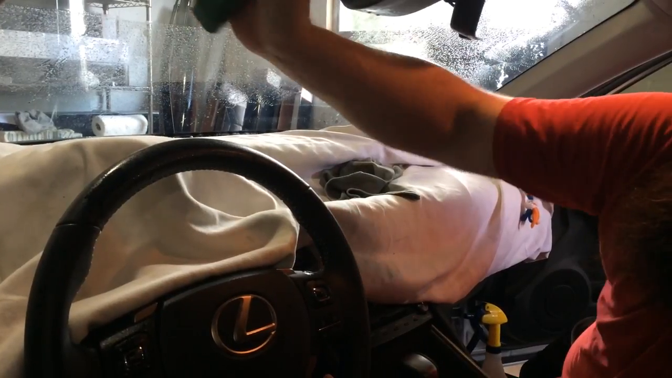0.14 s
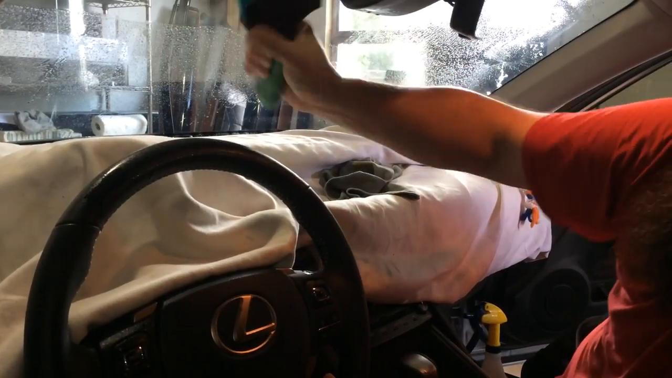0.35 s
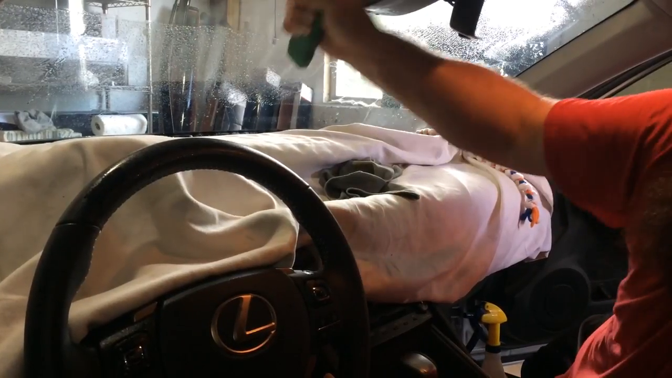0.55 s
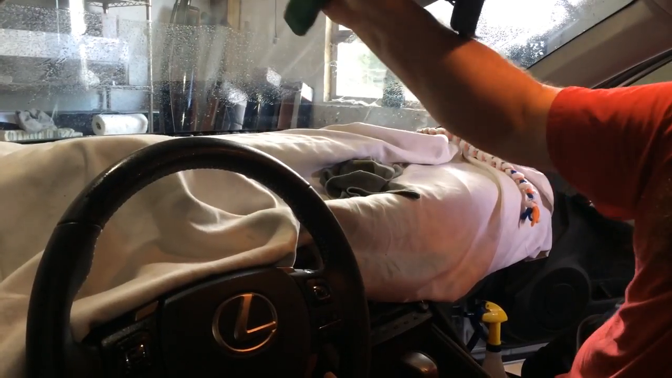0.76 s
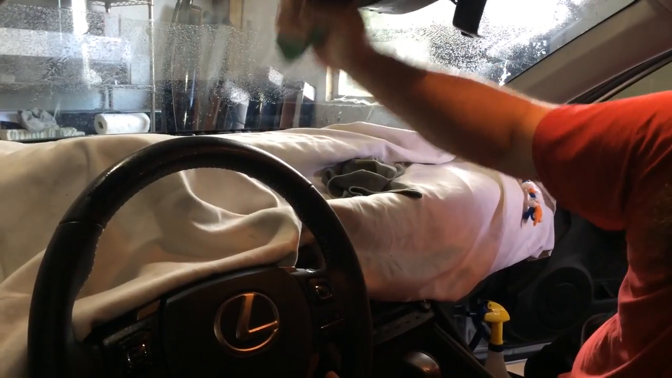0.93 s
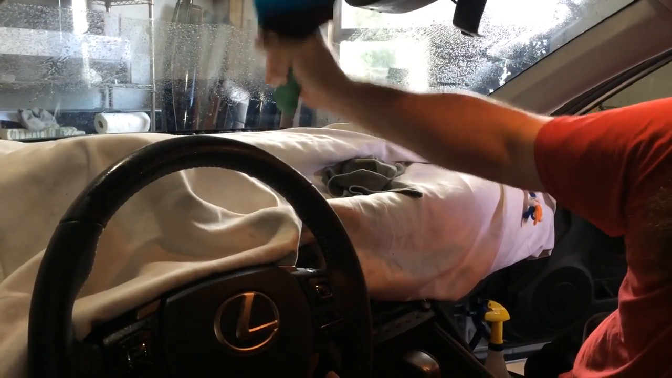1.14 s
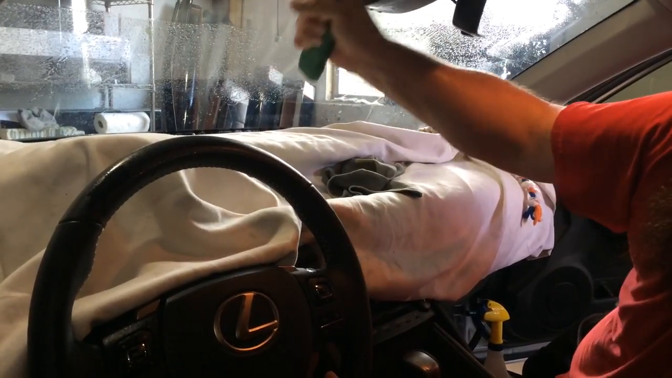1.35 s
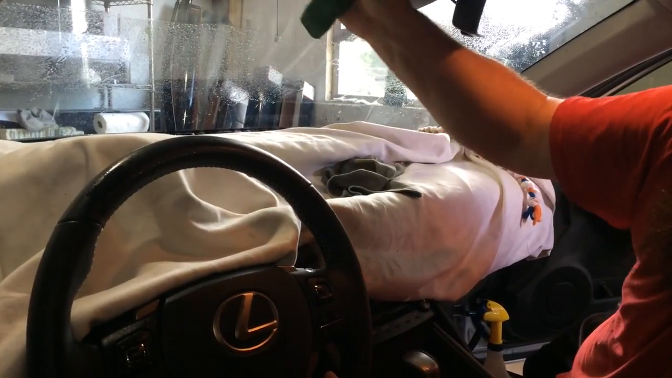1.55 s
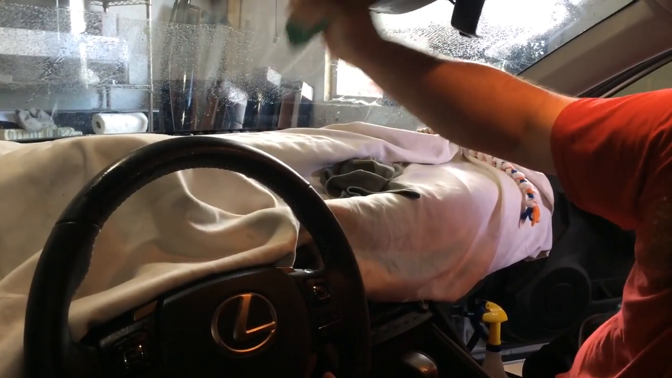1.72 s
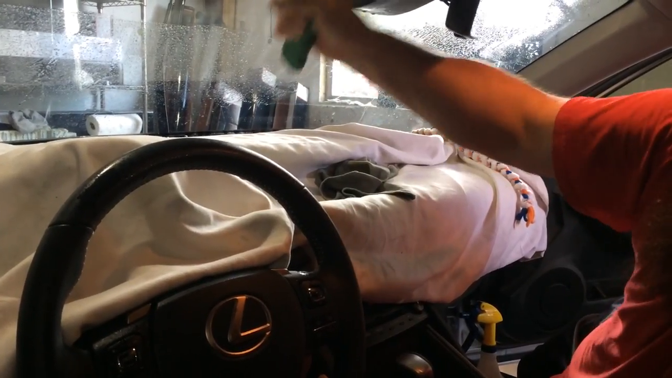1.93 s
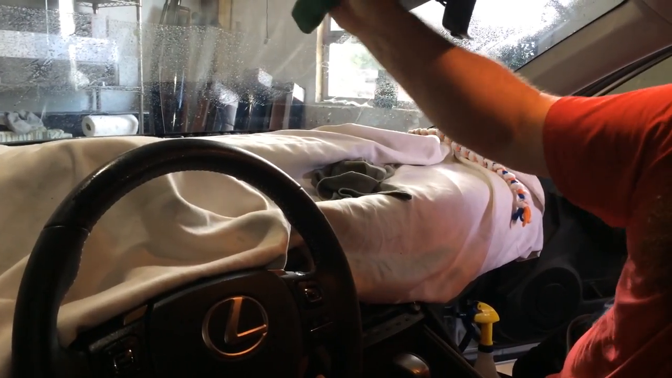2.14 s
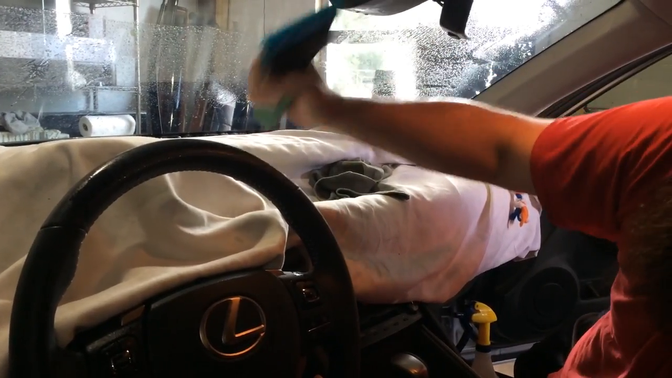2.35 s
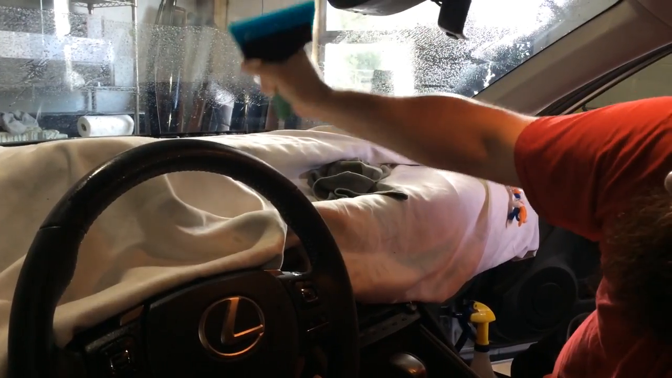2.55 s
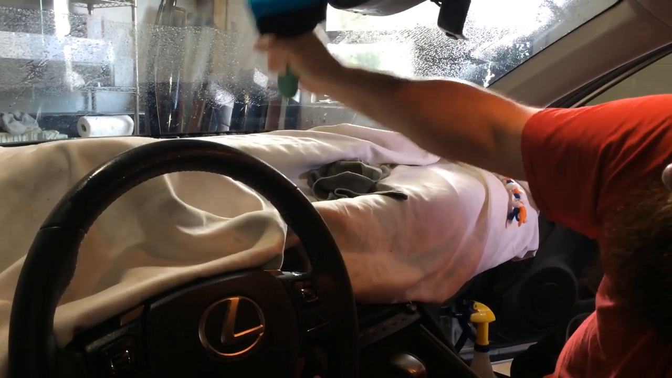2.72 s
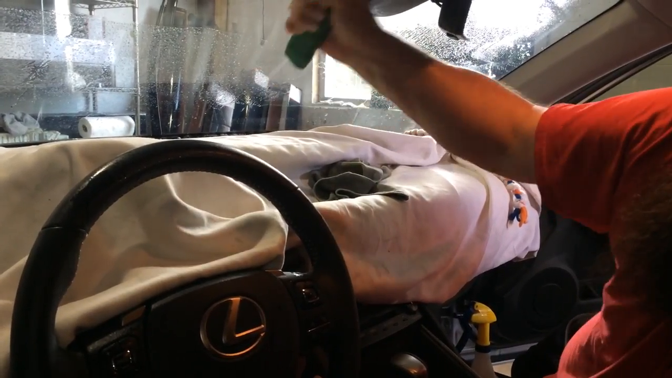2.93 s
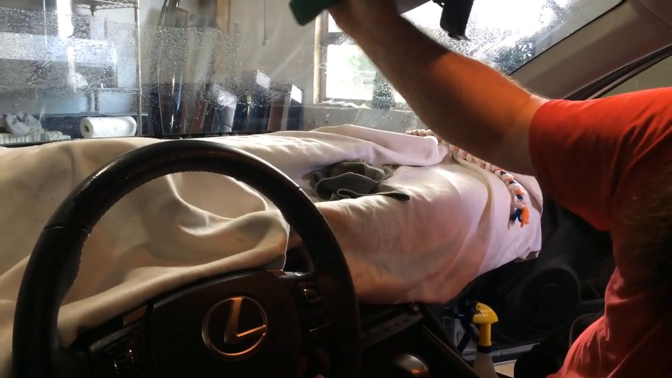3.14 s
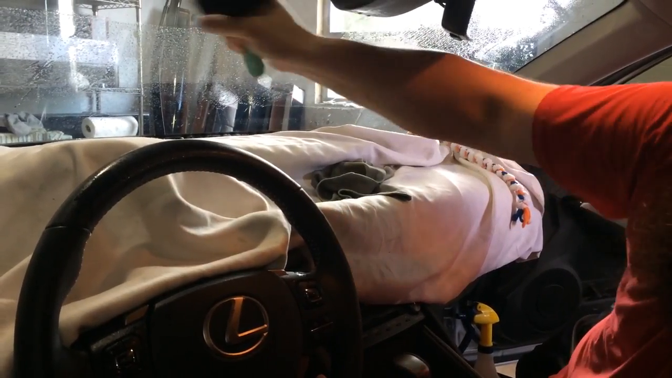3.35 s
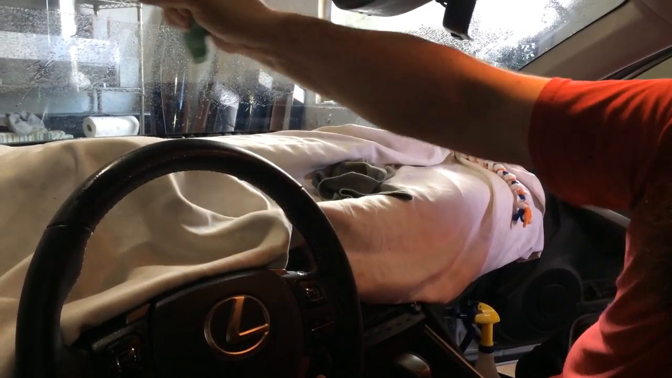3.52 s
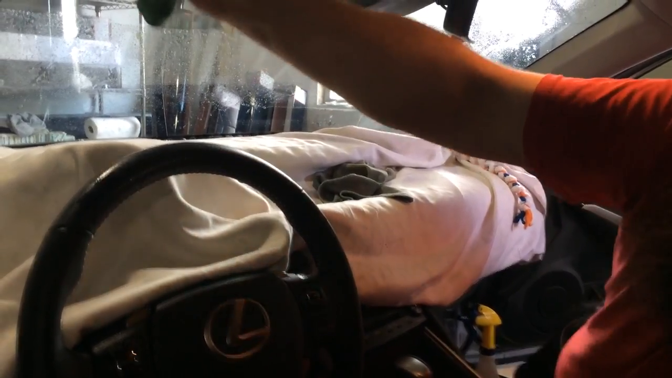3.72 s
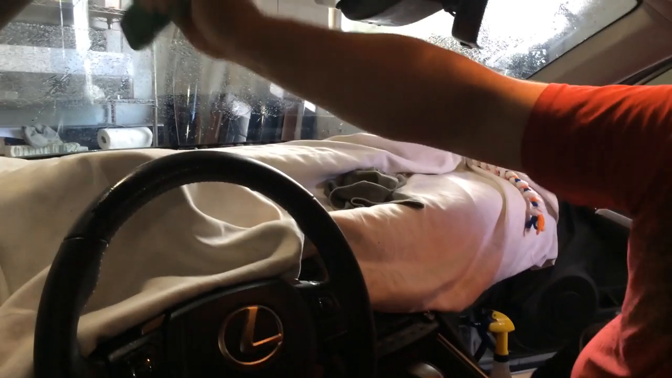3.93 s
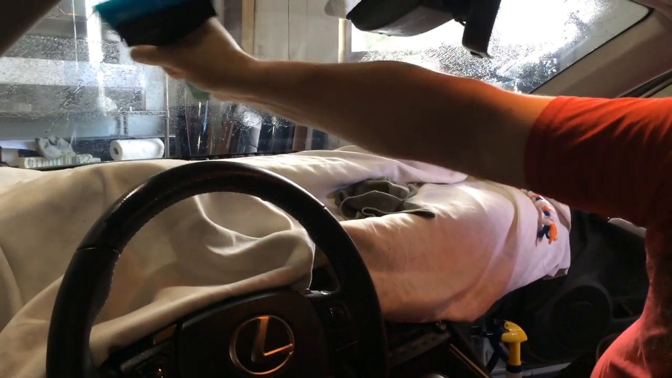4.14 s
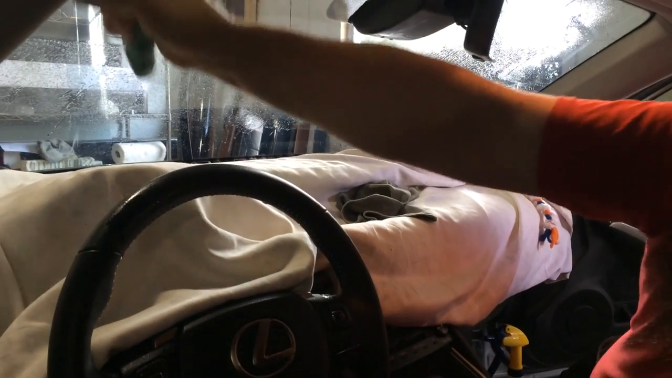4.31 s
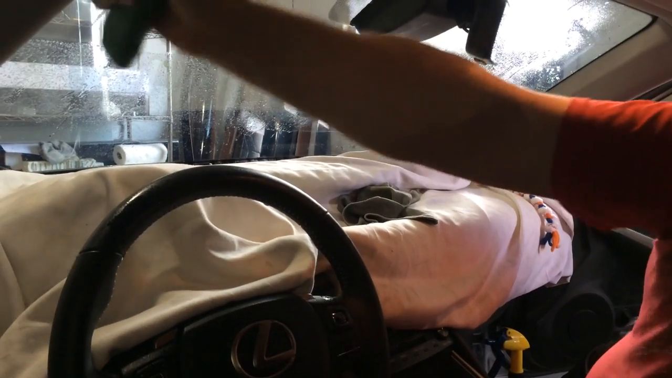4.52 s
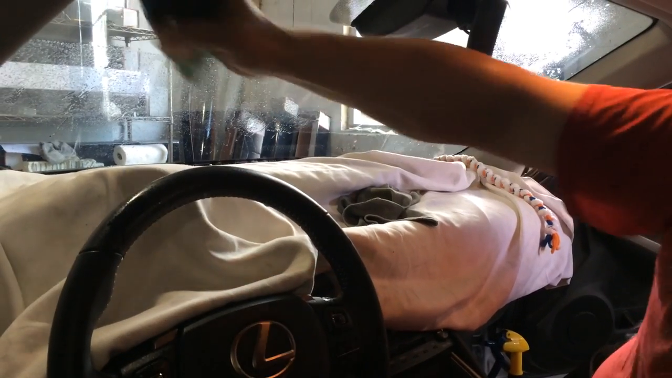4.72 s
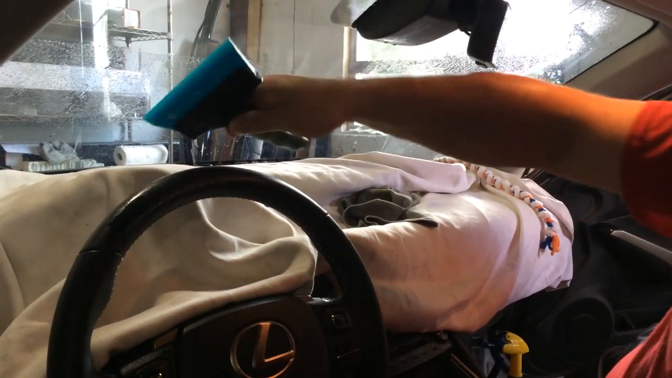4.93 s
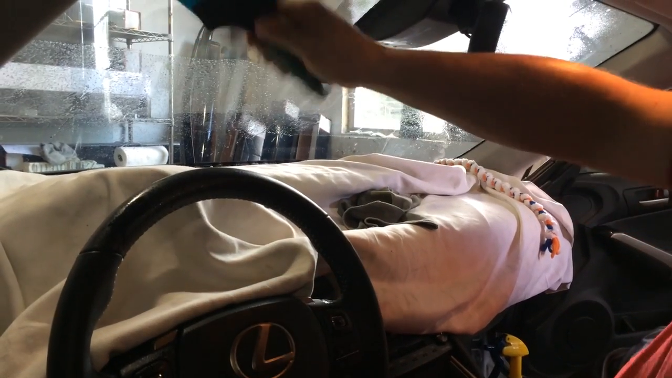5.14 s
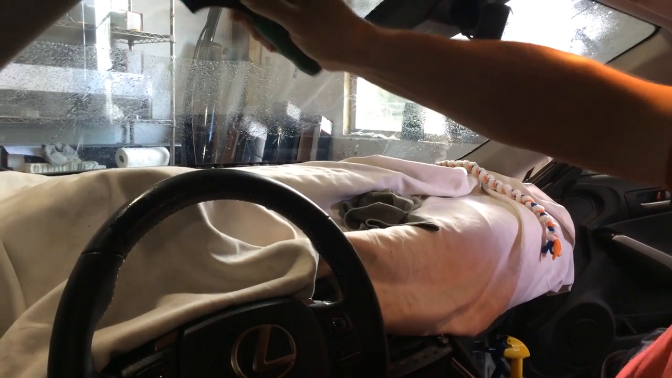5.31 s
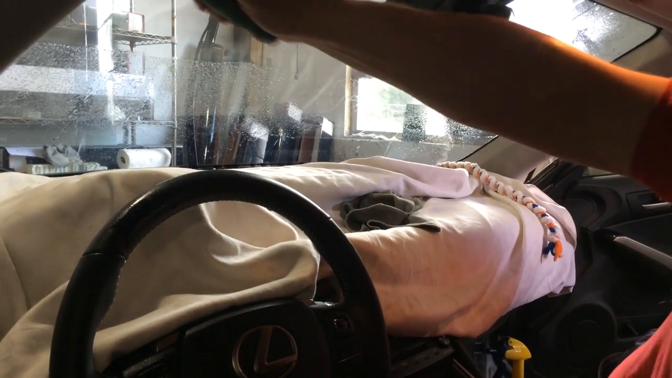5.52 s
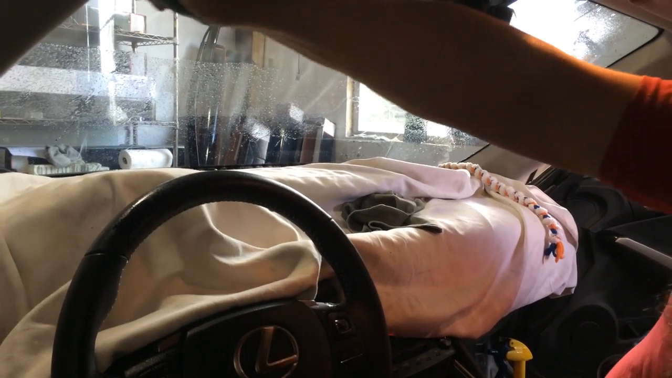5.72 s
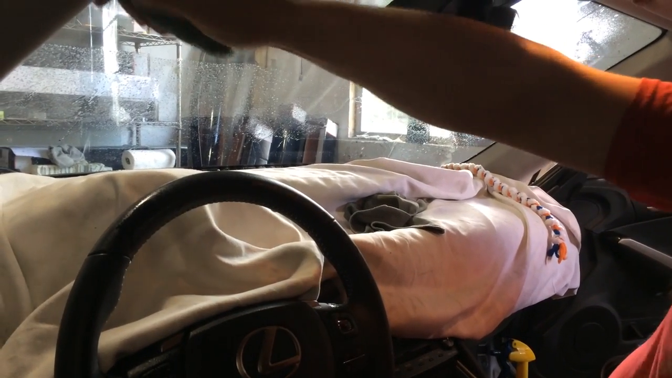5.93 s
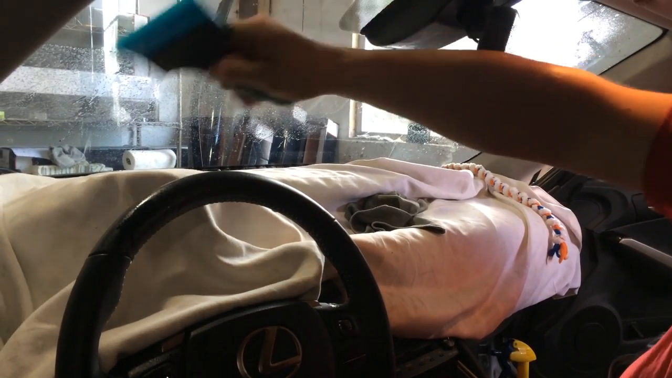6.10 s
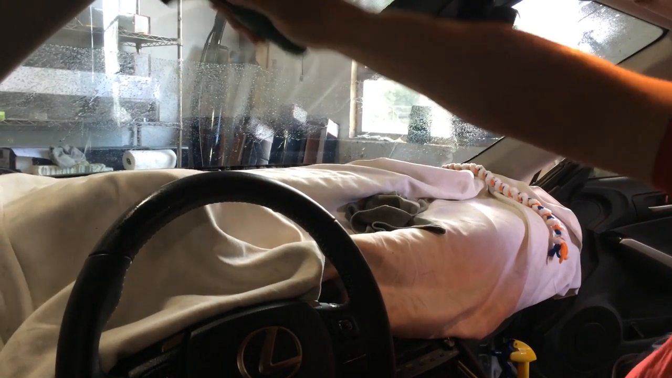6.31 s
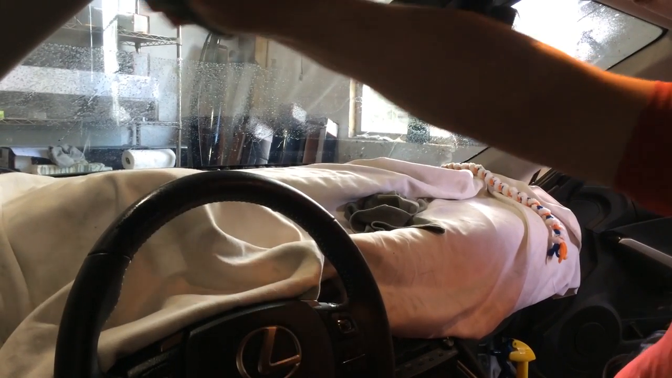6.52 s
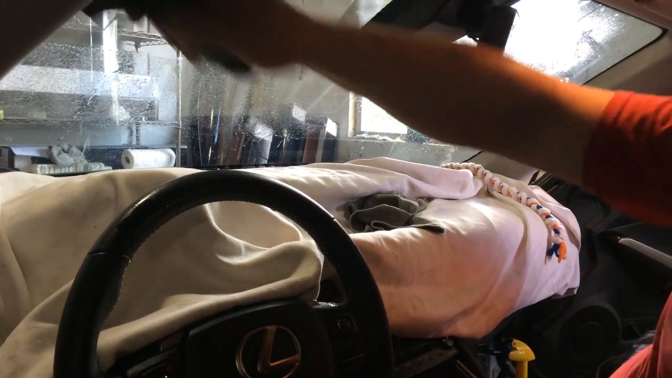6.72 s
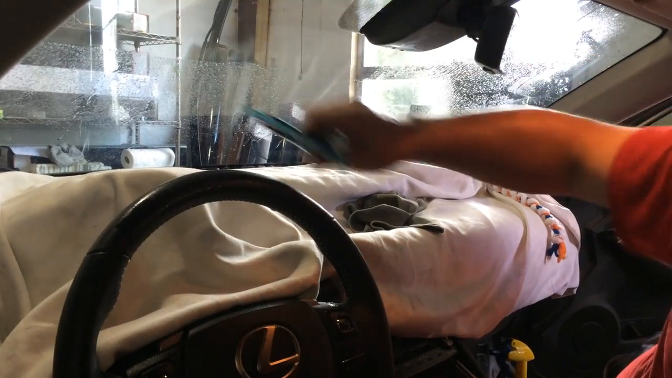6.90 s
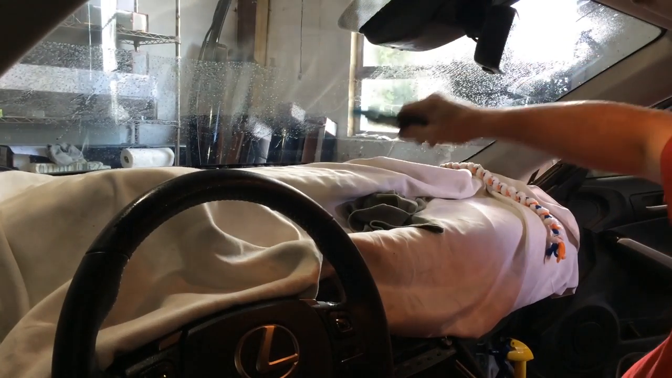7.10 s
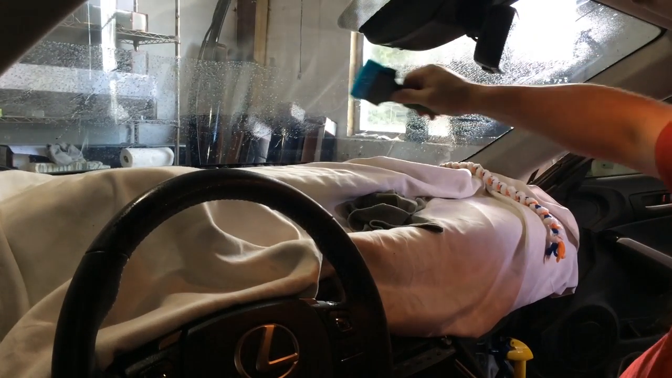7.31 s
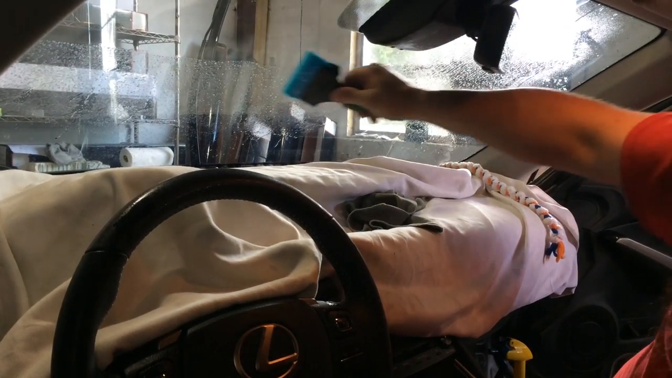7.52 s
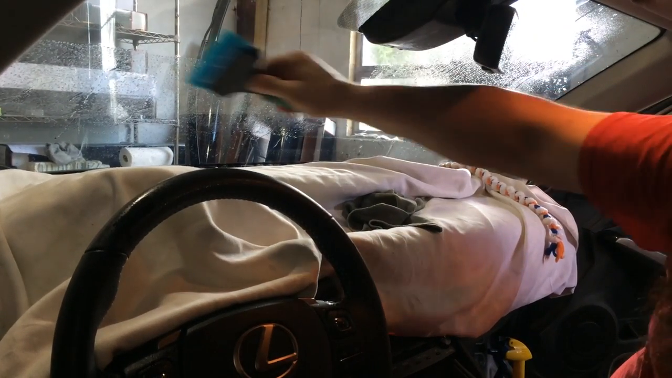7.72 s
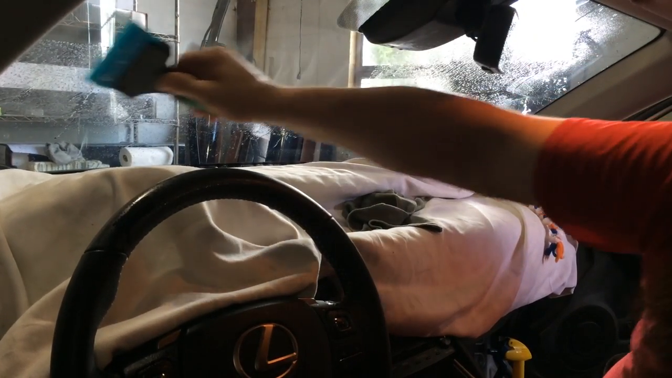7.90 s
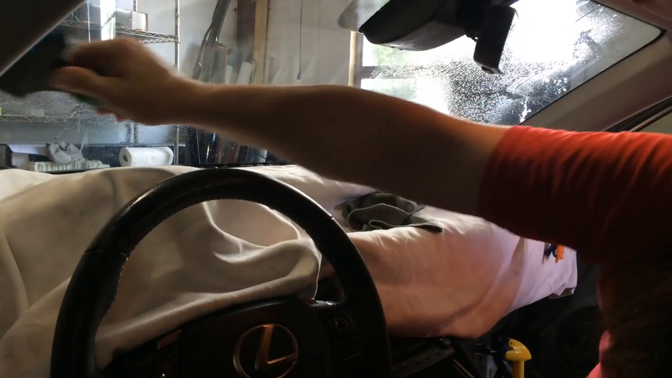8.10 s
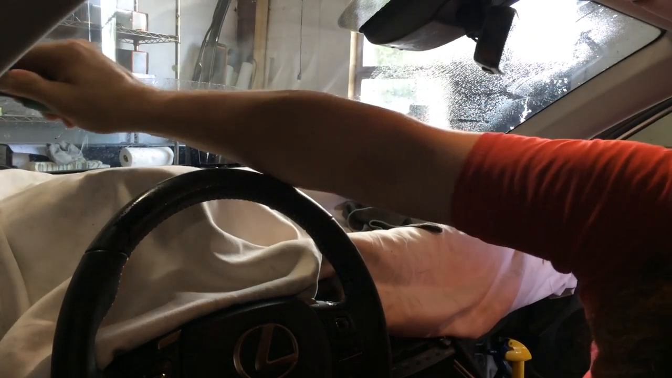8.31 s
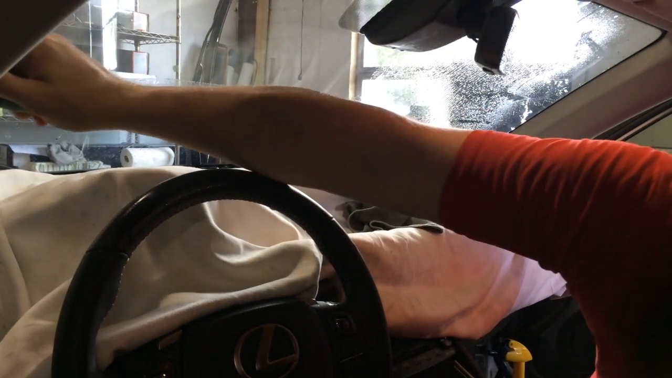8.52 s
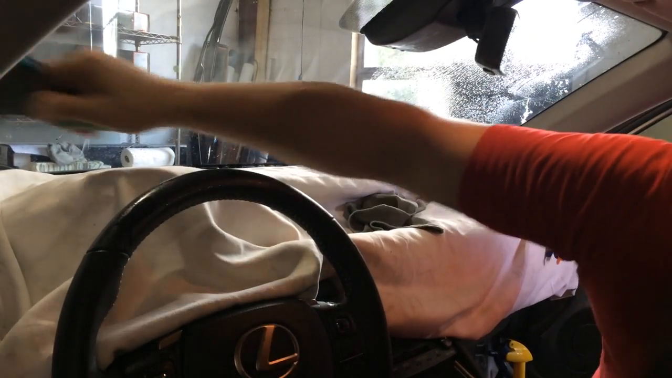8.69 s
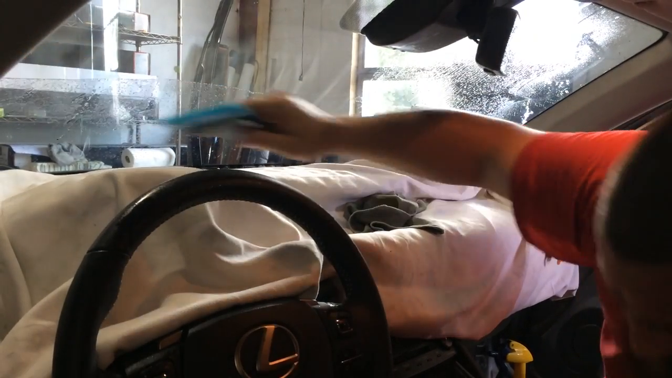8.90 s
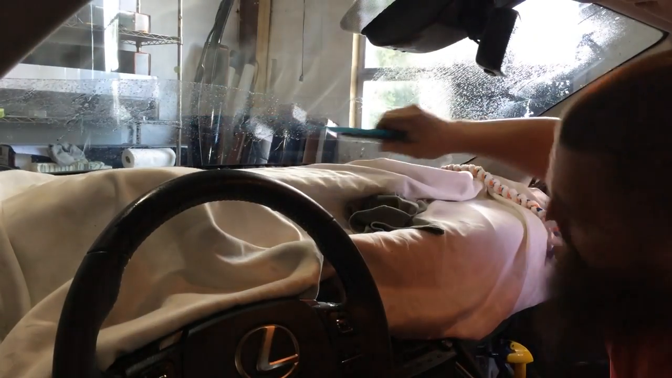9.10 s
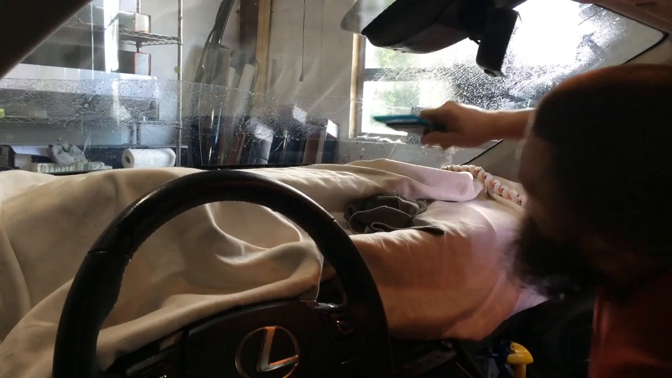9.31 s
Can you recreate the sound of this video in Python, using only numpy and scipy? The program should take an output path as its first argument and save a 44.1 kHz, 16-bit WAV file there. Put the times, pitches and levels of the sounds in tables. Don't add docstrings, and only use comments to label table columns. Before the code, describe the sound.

Inside a parked car, a squeegee slaps wet windshield glass nine times with sharp clacks, faint squeaks and wet swishes over a steady low hum.

```python
import sys
import numpy as np
from scipy import signal
from scipy.fft import rfft, irfft, next_fast_len
from scipy.io import wavfile
from scipy.ndimage import uniform_filter1d, map_coordinates

SR = 44100
rng = np.random.default_rng(int(sys.argv[2]) if len(sys.argv) > 2 else 0)


def wav_out(sig):
    wavfile.write(sys.argv[1], SR, np.round(np.clip(np.atleast_2d(sig).T, -1, 1) * 32767).astype(np.int16))


def makeup_ratio(level_db):
    decades = np.asarray(level_db, float) / 20
    return 10 ** decades


N = 412335
TIME = np.arange(N) / SR


def unit(x):
    return x / np.sqrt(np.mean(x ** 2) + 1e-20)


def along(points, hz):
    f, v = np.transpose(points)
    return np.interp(np.log(hz + 1), np.log(f + 1), v)


def filtered(x, response):
    m = next_fast_len(len(x) + SR // 4)
    return irfft(rfft(x, m) * response(np.fft.rfftfreq(m, 1 / SR)), m)[:len(x)]


def shaped(x, spectrum):
    return filtered(x, lambda hz: makeup_ratio(along(spectrum, hz)))


def resonant(peaks):
    def response(f):
        total = 0
        for k, (centre, width, db) in enumerate(peaks):
            damping = 1j * f * width
            total = total + (-1) ** k * makeup_ratio(db) * damping / (centre * centre - f * f + damping)
        return total
    return response


def noise(spectrum, patchy_db):
    z = signal.stft(rng.standard_normal(N + 512), nperseg=512)[2]
    field = uniform_filter1d(rng.standard_normal(z.shape), size=6, axis=0)
    field = uniform_filter1d(field, size=10, axis=1)
    white = signal.istft(z * makeup_ratio(patchy_db * unit(field)), nperseg=512)[1][:N]
    return unit(shaped(white, spectrum))


def add(track, s, sound):
    part = track[round(s * SR):][:len(sound)]
    part += sound[:len(part)]


def ring(modes):
    t = TIME[:SR // 2]
    gains = makeup_ratio(1.5 * rng.standard_normal(len(modes)))
    out = 0
    for gain, (hz, db, t60, side) in zip(gains, modes):
        out = out + gain * side * makeup_ratio(db - 60 * t / t60) * np.sin(2 * np.pi * hz * t)
    return out


def echo(x, decays):
    out, step = np.zeros(N), SR // 3
    for k in range(0, N, step):
        hz, t, z = signal.stft(rng.standard_normal(SR // 2), SR, nperseg=256)
        fade = makeup_ratio(-60 * t / along(decays, hz)[:, None])
        tail = signal.istft(z * fade, SR, nperseg=256)[1]
        add(out, k / SR, signal.fftconvolve(x[k:k + step], tail / np.linalg.norm(tail)))
    return out


# (frequency [Hz], width [Hz], level [dB])
HUM = [(145.76, 7.8, 0.5), (166.3, 12, -1.5)]
# (frequency [Hz], density [dB per Hz])
RUSH = [(25, -11.5), (60, -10), (100, -9.5), (160, -9), (290, -11.5), (420, -18), (800, -25), (1250, -26),
        (1700, -24.5), (2300, -29), (3200, -32.5), (4200, -37.5), (8000, -46), (15500, -54.5)]


def workshop():
    hum = filtered(rng.standard_normal(N), lambda hz: resonant(HUM)(hz) ** 2)
    sway = map_coordinates(rng.standard_normal(40), [TIME * 4])
    rush_db = -53.5 + 0.4 * sway
    return makeup_ratio(-51) * unit(hum) + makeup_ratio(rush_db) * noise(RUSH, patchy_db=1.68)


# (time [s], hiss level [dB])
HISS = [(0, -86), (1.5, -75.5), (4.6, -74), (5.7, -79), (8.0, -91), (8.75, -72), (8.9, -60.5),
        (9.35, -54.5)]
# (time [s], crack [dB], glass [dB], knock centre [Hz], edge sharpness [dB])
SLAPS = [
    (0.5001, -25.5, -23, 870, -0.5),
    (1.2489, -23, -18, 860, -2),
    (1.8981, -19, -19.5, 920, -1.5),
    (2.6567, -26.5, -28.5, 1010, 0),
    (3.4106, -9.5, -19.5, 1264, 5.5),
    (4.1975, -16.5, -27, 1124, -4.5),
    (5.2578, -24.5, -21, 806, -22),
    (6.2933, -19, -28.5, 880, 0.5),
    (7.3211, -26.5, -24.5, 746, -19),
]


def faint_hiss():
    power = makeup_ratio(np.interp(TIME, *np.transpose(HISS))) ** 2
    drain_db, drain_t60 = -46.5, 0.89
    for s, db, *_ in SLAPS:
        add(power, s, makeup_ratio(db + drain_db - 60 * TIME[:SR] / drain_t60) ** 2)
    return power


# (time [s], length [s], level [dB], brightness [dB])
SWISHES = [(.083, .066, -73, 0.1), (.247, .026, -59, -1.5), (0.6, 0.063, -74, -12), (.682, 0.023, -80, 9),
           (0.805, 0.036, -63, -6), (.954, 0.041, -60, -4.5), (1.532, 0.097, -68.5, 7.5),
           (1.546, 0.011, -56, 9.5), (1.715, 0.015, -64.5, -1.5), (2.127, 0.04, -64.5, 1.5),
           (2.259, 0.019, -54, -6), (2.562, .024, -80, -8), (2.908, .023, -70, 1.5), (3.123, .048, -68, -4),
           (3.234, 0.016, -55, -5.5), (3.806, .047, -68, -5), (3.912, .03, -70.5, 1),
           (3.952, 0.039, -72, -18), (4.492, 0.04, -68.5, -13), (4.604, .026, -64.5, -3),
           (4.892, .084, -77, 4), (5.092, .067, -70, 0), (5.91, 0.035, -78, -1.5), (5.976, .029, -78, 0.1),
           (6.111, 0.044, -84, -5), (7.653, 0.018, -81, 5), (8.164, 0.091, -73.5, -1),
           (8.956, 0.052, -61.5, 0), (9.17, .03, -78, 1.5)]
# (time [s], level [dB], brightness [dB])
SPITS = [(.338, -68, -2.5), (.454, -63, -10), (.469, -73, -15), (.769, -69, 9), (2.162, -63, -5),
         (3.027, -78, -12), (4.028, -75, -15), (4.105, -64.5, 1.5), (4.658, -77, -4), (4.978, -64.5, -1),
         (5.45, -69, -3), (5.811, -69, -7), (6.624, -75, -5), (6.72, -74, 4), (7.173, -71, -4),
         (7.721, -76, -7), (7.853, -65.5, -2.5), (8.349, -68.5, -6), (8.592, -73, 8)]
# (frequency [Hz], density [dB per Hz])
WET = [
    [(700, -47.5), (2000, -22.5), (4000, -23), (5000, -26.5), (8000, -43)],
    [(3200, -20), (5000, 1), (6300, 6), (8500, -0.5), (13000, -19)],
    [(5500, -29), (9000, -15), (11000, -14), (15000, -18), (17000, -17)],
]


def water():
    power = np.outer(makeup_ratio([-9., -10.5, -11.]) ** 2, faint_hiss())
    spits = [(s, 0.0066, db, bright_db) for s, db, bright_db in SPITS]
    for s, length, db, bright_db in SWISHES + spits:
        span = slice(max(round((s - 2 * length) * SR), 0), round((s + 2 * length) * SR))
        bell = np.exp(-abs((TIME[span] - s) / (0.47 * length)) ** 2.05)
        low_db = db + 0.5 - 0.57 * bright_db
        power[:, span] += np.outer(makeup_ratio([low_db, db, db + bright_db]) ** 2, bell)
    drops = makeup_ratio(1.55 * unit(uniform_filter1d(rng.standard_normal(N), size=40)))
    return sum(np.sqrt(p) * unit(drops * noise(band, patchy_db=4.0)) for p, band in zip(power, WET))


# (time [s], length [s], frequency
# [Hz], width [Hz], level [dB])
WHISTLES = [(.03, .05, 1700, 250, -67), (1.548, .008, 7500, 2500, -54), (2.262, .02, 5400, 700, -61),
            (2.9, .08, 1800, 200, -68), (3.232, .02, 5400, 700, -60), (3.95, .2, 3200, 600, -69),
            (3.97, .14, 1800, 350, -66), (4.44, .07, 7600, 800, -76), (4.47, .1, 1750, 200, -69),
            (8.63, .06, 6500, 250, -77), (8.695, .06, 3350, 200, -67), (8.96, .05, 6200, 1300, -61),
            (9.19, .04, 11000, 6000, -66), (9.315, .035, 4500, 5000, -60)]


def whistles():
    out = np.zeros(N)
    for s, length, hz, width_hz, db in WHISTLES:
        t = TIME[:round(2 * length * SR)]
        band = filtered(rng.standard_normal(SR // 2), lambda f: resonant([(hz, width_hz, 0)])(f) ** 2)
        swell = np.sin(np.pi * t / (2 * length)) ** 2
        add(out, max(s - length, 0), makeup_ratio(db) * unit(band)[:len(t)] * swell)
    return out


# (frequency [Hz], density [dB per Hz])
CRACK = [(700, -33), (2200, 25.5), (2600, 22.5), (4000, 14), (5000, 4.5), (6500, 14.5), (8000, -6),
         (11000, -73.5)]
# (frequency [Hz], density [dB per Hz])
TOP = [(5000, -12), (8000, -6), (10000, -5), (12500, -12), (15500, -22)]
# (share of the knock centre [1], width [Hz], level [dB])
BLADE = [(0.549, 400, 0.5), (0.999, 549, 10.5), (1.4, 600, 9.5), (1.9, 734, 5), (2.598, 850, -56.5)]


def contact(knock_db, knock_hz, top_db, click_db, t60):
    t = TIME[:SR // 8]
    spikes = rng.standard_normal(len(t)) * rng.random(len(t)) ** 2
    force = .25 * unit(spikes) * makeup_ratio(-60 * t / np.clip(t60, .005, .2))
    force[:12] -= makeup_ratio(click_db) * np.hanning(12) ** 3
    force = np.pad(force, (32, 0))
    crack, top = shaped(force, CRACK), shaped(force, TOP)
    blade = resonant([(share * knock_hz, w, db) for share, w, db in BLADE])
    soft_hz = 4650
    knock = filtered(force, lambda hz: blade(hz) / (1 + 1j * hz / soft_hz) ** 2)
    return sum(makeup_ratio(db) * part / abs(part).max() for db, part in ((0, crack), (knock_db, knock), (top_db, top)))


# (time [s], crack [dB], knock [dB], edge sharpness [dB])
TOUCHES = [(0.467, -52, 9, -20), (0.511, -48, -3, -7), (1.2456, -35, -2, -12), (1.256, -21.5, 3.5, -3),
           (1.9088, -23.5, 3.5, 0), (2.652, -48, 8, -9), (2.6672, -31.5, -1, 1), (2.6715, -46, -8, -1.5),
           (3.399, -54, -7, -3.5), (3.409, -43, -1, -16), (4.19, -40, 9, -18), (5.2604, -30, 4, -7.5),
           (6.2855, -47, 10, -14), (6.298, -30, 0, -22), (7.3229, -29.5, 7, -14), (7.358, -53, 1, 1.5),
           (8.589, -57, 11.5, -9)]
# (frequency [Hz], level [dB], t60 [s], side of the mode shape at the microphone [signed gain])
BOOM = [(60, 0, 0.23, -1)]
DRUM = [(82.6, -2.5, .14, 1.6), (97, -0.35, 0.26, -1), (120, -16, 0.65, -1.5)]
ROOF = [(144, 0, .38, 1)]
GLASS = [(168, 0, .22, 1), (207, -3, .1, -1)]
UPPER = [(252, 0, 0.15, 0.74), (300, -5, .05, -1.1), (378.4, -5, 0.099, 1), (496, -10.5, 0.014, -0.25),
         (600, 14, 0.07, -0.023)]
SHARES_DB = [-6, -10, -11.5, -12.5]
SHARES_DB_PER_S = [-.3, 0.31, 1.1, 1.1]


def slaps():
    blade, body = np.zeros(N), np.zeros(N)
    for s, db, glass_db, knock_hz, top_db in SLAPS:
        t60 = .028 * np.exp(-0.06 * (db + 17.5))
        add(blade, s + .0004, makeup_ratio(db) * contact(6.5, knock_hz, top_db, click_db=3, t60=t60))
        shares_db = np.array(SHARES_DB) + s * np.array(SHARES_DB_PER_S)
        groups = (BOOM, DRUM, ROOF, UPPER)
        others = sum(makeup_ratio(share_db) * ring(modes) for share_db, modes in zip(shares_db, groups))
        add(body, s + .001, makeup_ratio(glass_db) * (ring(GLASS) + others))
    for s, db, knock_db, top_db in TOUCHES:
        add(blade, s, makeup_ratio(db - 1) * contact(knock_db, 1356, top_db, click_db=-6.0, t60=0.017))
    return blade, body


# (time [s], push [dB], boom [dB], dullness [ms])
BUMPS = [
    (0.479, -42.5, 8, 2.4),
    (1.708, -32, -22, 6.6),
    (2.141, -36.5, 0, 2.6),
    (3.513, -39.5, 8.5, 4.4),
    (3.546, -38.5, 16, 13),
    (7.298, -34, -5, 3.4),
    (8.594, -41.5, -10, 1.9),
    (8.68, -47, 1, 4.5),
]


def bumps():
    out = np.zeros(N)
    for s, db, boom_db, ms in BUMPS:
        u = TIME[:SR // 20] * 3000 / ms
        push = u * np.exp(-u)
        damped = ring(GLASS + ROOF) * makeup_ratio(-200 * TIME[:SR // 2])
        sound = makeup_ratio(boom_db) * ring(BOOM + DRUM) + damped
        add(out, s, makeup_ratio(db) * np.convolve(sound, push / push.sum()))
    return out


# (frequency [Hz], density [dB per Hz])
FAR = [(200, -22), (1200, 10), (3000, -3.5), (7000, -10.5), (12000, -24.5), (16000, -37.5)]
# (frequency [Hz], t60 [s])
SHOP = [(300, 0.17), (2000, 0.32), (6000, 0.54), (14000, 0.067)]


def shop_answer():
    blows = np.zeros(N)
    s, db = np.transpose(SLAPS)[:2]
    blows[np.round(s * SR).astype(int) + 400] = makeup_ratio(db)
    return echo(shaped(blows, FAR), SHOP)


# (time [s], length [s], slip rate at start [Hz], at end [Hz], level [dB])
SQUEAKS = [(0.569, 0.054, 300, 260, -58), (0.602, 0.058, 338.6, 203, -53), (0.642, 0.062, 292, 206, -58.5),
           (.789, 0.054, 300, 150, -61), (2.017, .05, 287.6, 270, -56), (2.059, 0.054, 271.5, 240, -56),
           (2.771, 0.08, 290.7, 440, -58.5), (2.827, 0.052, 334.6, 260, -57.5),
           (2.855, 0.036, 300, 290, -53.5), (2.891, 0.078, 300, 330, -58.5), (3.022, 0.061, 214, 294, -54),
           (3.057, .05, 262.7, 300, -52.5), (3.766, .12, 356, 350, -70)]
# (time [s], length [s], level [dB])
LIFTS = [
    (.926, 0.043, -49),
    (1.7, 0.016, -54),
    (2.126, 0.017, -54),
    (2.247, 0.034, -48.5),
    (3.216, 0.032, -57.5),
    (4.494, 0.03, -53.5),
    (4.593, 0.017, -58),
]
# (frequency [Hz], width [Hz], level [dB])
RUBBER = [(266, 160, 2.5), (584, 326, 4.5), (910, 510, 2), (1200, 300, 0.5), (1950, 600, -13)]


def squeaks():
    out = np.zeros(N)
    lift_hz = 459
    lifts = [(s, length, lift_hz, lift_hz, db) for s, length, db in LIFTS]
    for s, length, hz0, hz1, db in SQUEAKS + lifts:
        t = TIME[:round(length * SR)]
        drift = uniform_filter1d(rng.standard_normal(SR // 8), size=500)[:len(t)]
        rate = np.interp(t, [0, length], [hz0, hz1]) * (1 + .6 * drift)
        turns = np.cumsum(rate) / SR
        slips = np.diff(np.floor(turns), prepend=0) * makeup_ratio(3 * rng.standard_normal(SR // 8)[:len(t)])
        slips += .022 * rng.standard_normal(SR // 8)[:len(t)]
        swell = np.sin(np.pi * t / length) ** 0.55
        add(out, s, makeup_ratio(db) * unit(filtered(np.pad(slips * swell, (0, 400)), resonant(RUBBER))))
    return out


# (time [s], level [dB], lowest ring [Hz])
KNUCKLES = [(1.708, -47, 260), (2.276, -34, 300), (3.598, -46, 270), (3.605, -43, 286), (4.508, -40, 300),
            (5.824, -40, 260), (6.6287, -27.5, 220), (6.634, -36, 203), (6.6405, -30.5, 189),
            (8.589, -41, 260), (8.597, -42.5, 300)]
# (multiple of the lowest ring [1], width [Hz], level [dB])
TRIM = [(1., 110, 0), (2.6, 300, -7), (4.4, 350, -11)]


def knuckles():
    out = np.zeros(N)
    blow = np.pad(np.hanning(66), (0, 2000))
    for s, db, hz in KNUCKLES:
        knock = filtered(blow, resonant([(share * hz, w, level) for share, w, level in TRIM]))
        add(out, s, makeup_ratio(db) * knock / abs(knock).max())
    return out


# (frequency [Hz], t60 [s])
CABIN = [(300, 0.15), (1500, 0.052), (6000, 0.048), (14000, 0.0086)]


def scene():
    blade, body = slaps()
    near = blade + squeaks() + whistles()
    space = makeup_ratio(-8) * echo(near, CABIN) + makeup_ratio(0.5) * shop_answer()
    return (near + space + body + bumps() + knuckles() + water() + workshop())[None]


def low_pass(x):
    return signal.sosfilt(signal.butter(12, 16450, fs=SR, output="sos"), x)


# (frequency [Hz], level [dB])
BAND = [(15, -40), (33, 0), (52, 2), (15300, -0.5), (15600, -20), (16500, -39.5)]


def record(dry):
    mix = shaped(dry[0], BAND)[None]
    return low_pass(mix)


dry = scene()
out = record(dry)
wav_out(out)
```